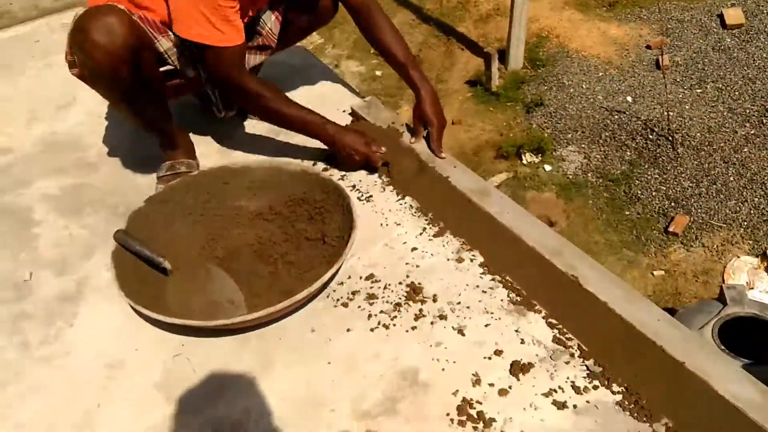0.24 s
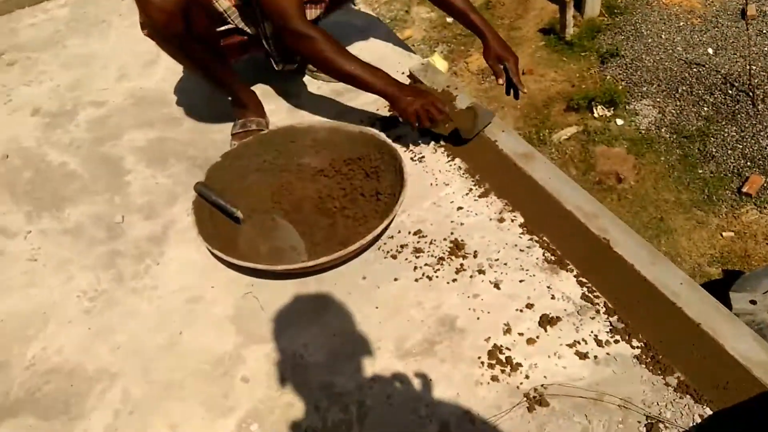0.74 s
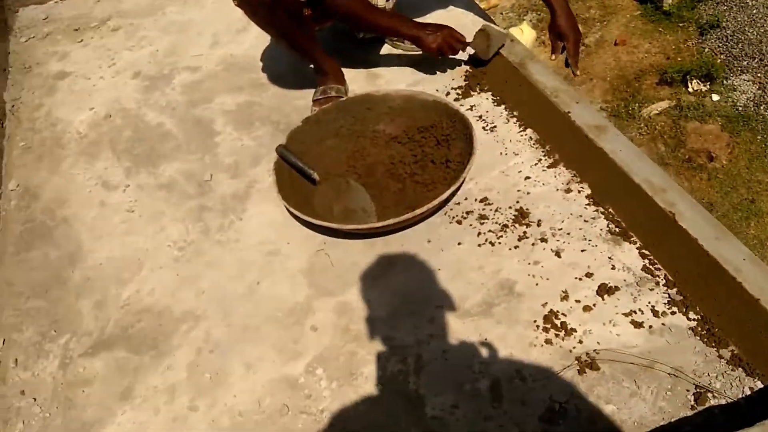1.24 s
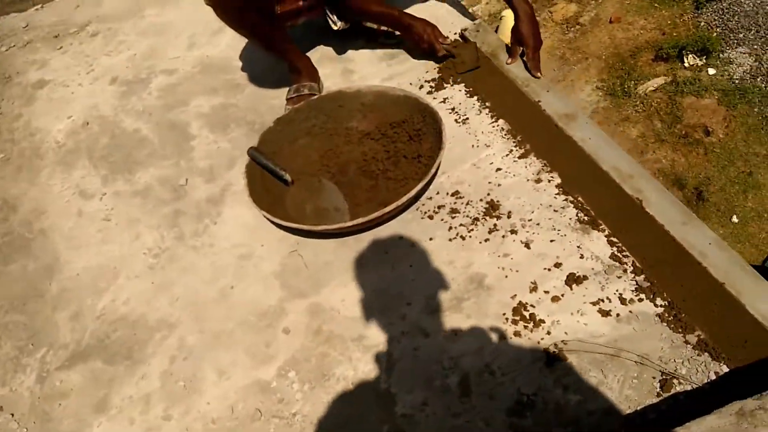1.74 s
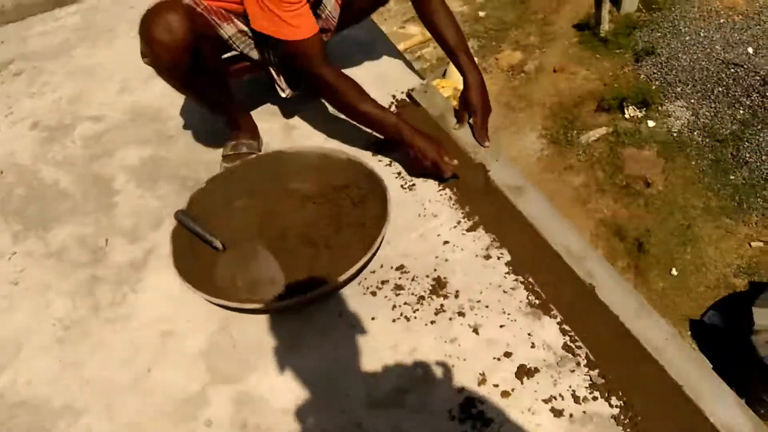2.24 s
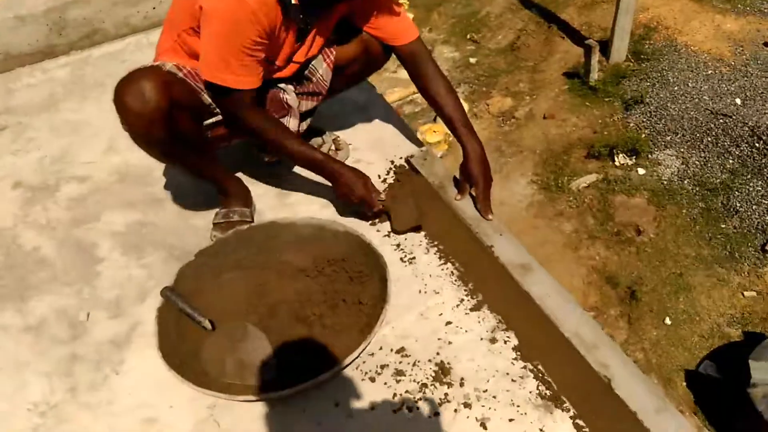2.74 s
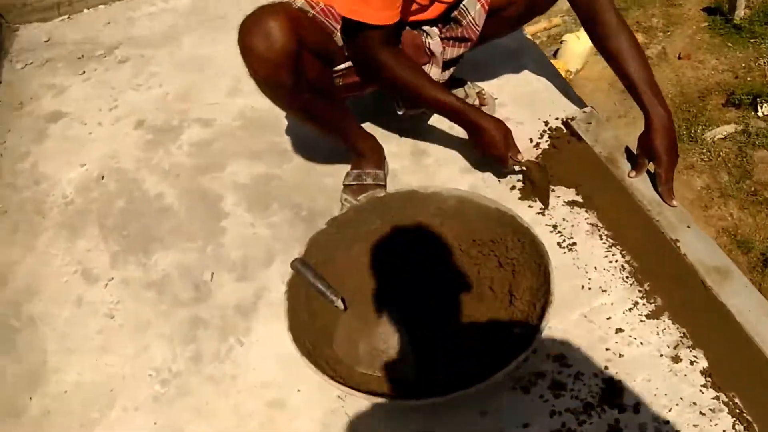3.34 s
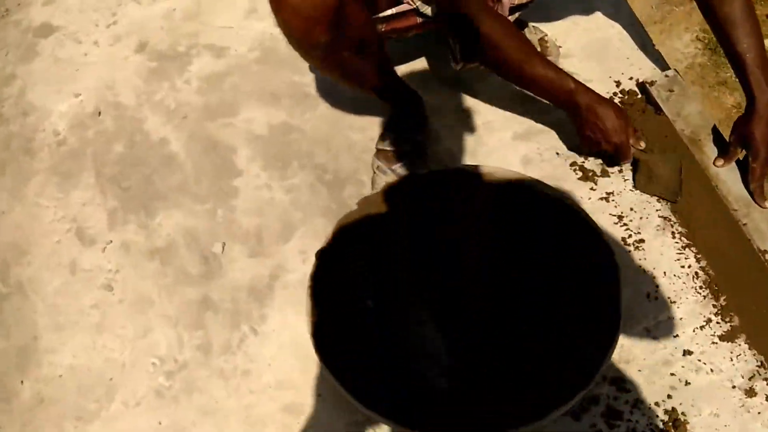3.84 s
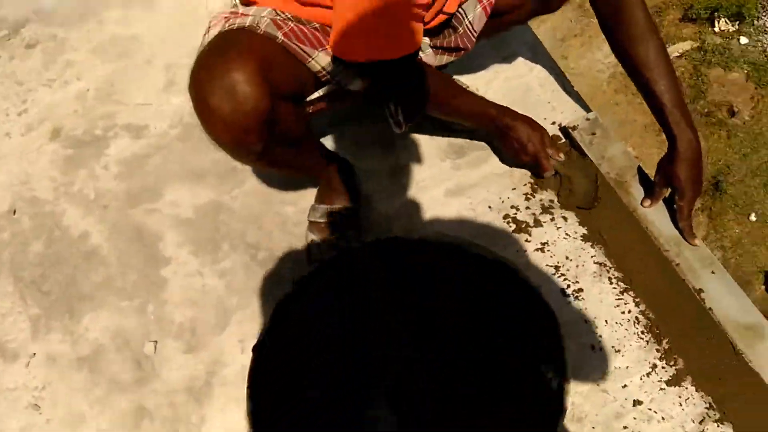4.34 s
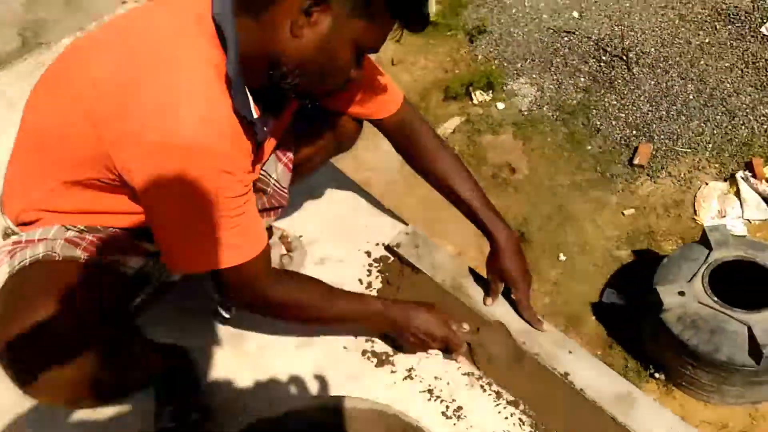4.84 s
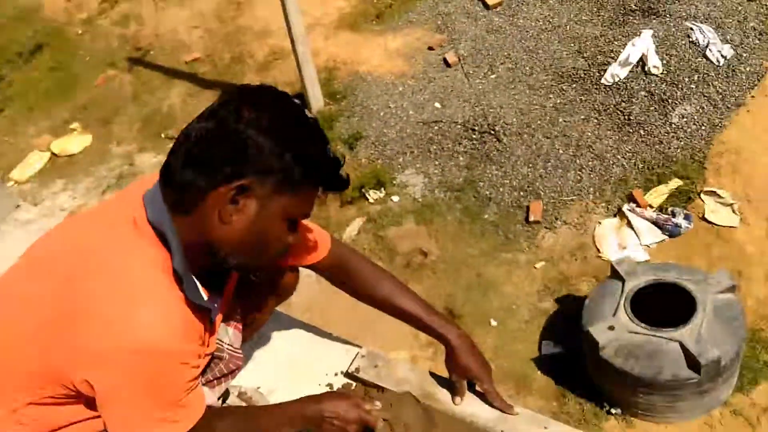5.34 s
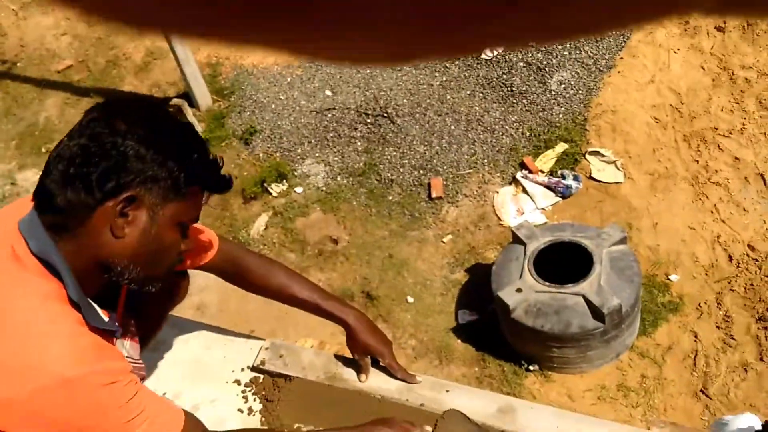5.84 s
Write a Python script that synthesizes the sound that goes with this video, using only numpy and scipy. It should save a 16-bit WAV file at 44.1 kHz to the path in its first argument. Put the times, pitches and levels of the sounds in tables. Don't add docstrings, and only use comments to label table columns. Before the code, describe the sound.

Wet mortar slaps with a short metallic ring, sandy trowel scrapes and crunching grit, under buffeting wind that overloads a close microphone.

```python
import sys
import numpy as np
from scipy import signal
from scipy.fft import rfft, irfft
from scipy.io import wavfile
from scipy.ndimage import uniform_filter1d

SR = 44100
rng = np.random.default_rng(int(sys.argv[2]) if len(sys.argv) > 2 else 0)


def rack_gain(trim_db):
    fader = np.asarray(trim_db, float)
    return 10 ** (fader / 20)


def waveform_to_disk(signal):
    frames = np.transpose(np.atleast_2d(signal))
    scaled = np.clip(frames, -1, 1) * 32767
    samples = np.round(scaled).astype(np.int16)
    wavfile.write(sys.argv[1], SR, samples)


N = 269010
CLOCK = np.arange(N) / SR
COARSE = np.arange(0, N / SR + .01, .002)


def evened(x):
    return x / np.sqrt(np.mean(x ** 2) + 1e-20)


def colour(x, spectrum, lo_hz=0, hi_hz=SR):
    size = x.shape[-1]
    hz = np.fft.rfftfreq(size, 1 / SR)
    f, db = np.transpose(spectrum)
    outside = (hz < f[0]) | (hz > f[-1])
    z = rfft(x) * rack_gain(np.interp(np.log(hz + 1), np.log(f + 1), db) - 80 * outside)
    band = irfft(z * ((hz >= lo_hz) & (hz <= hi_hz)), size)
    return irfft(z, size) / np.sqrt(np.mean(band ** 2))


def curves(rows):
    s, *columns = np.transpose(rows)
    return [np.interp(CLOCK, s, c) for c in columns]


def drift(top_hz, channels=1, size=N):
    return evened(signal.lfilter(*signal.butter(2, top_hz, fs=SR), rng.standard_normal((channels, size))))


def grains(per_s, spread_db, channels=1):
    size = rack_gain(spread_db * np.minimum(rng.exponential(1, (channels, N)), 5))
    return size * rng.standard_normal((channels, N)) * (rng.random((channels, N)) < per_s / SR)


def resonate(x, hz, width):
    r = np.exp(-np.pi * width / SR)
    if np.isscalar(hz):
        return 2 * signal.lfilter([1 - r], [1, -r * np.exp(2j * np.pi * hz / SR)], x).real
    turn = np.exp(2j * np.pi * np.cumsum(hz) / SR)
    return 2 * (turn * signal.lfilter([1 - r], [1, -r], x * turn.conj())).real


def add(mix, s, sound):
    part = mix[round(s * SR):][:len(sound)]
    part += sound[:len(part)]


def ports(level_db, pan_db):
    return 2 * rack_gain(level_db) / np.sqrt(1 + rack_gain(2 * np.array([-pan_db, pan_db])))


def swells(rows, ends_db, flat):
    middle, length, db = np.transpose(rows)[:3, :, None]
    from_middle = abs(2 * (COARSE - middle) / np.maximum(length, .02))
    return rack_gain(2 * (db + ends_db * from_middle ** flat)) + 1e-30


def fine(v):
    return np.interp(CLOCK, COARSE, v)


def buffets(rows, ends_db, flat, calm):
    share = ports(0, np.transpose(rows)[3]) ** 2
    return np.sqrt(calm ** 2 + [fine(p) for p in share @ swells(rows, ends_db, flat)])


def patchy(x, patch_db):
    z = signal.stft(x, nperseg=512, noverlap=384)[2]
    field = uniform_filter1d(rng.standard_normal(z.shape), size=12, axis=0)
    field = uniform_filter1d(field, size=22, axis=1)
    return evened(signal.istft(z * rack_gain(patch_db * evened(field)), nperseg=512, noverlap=384)[1][:N])


# pitch_hz, level_db (per Hz)
AIR_TONE = [(180, -41), (300, -1), (985, -18), (2130, -11.5), (4300, -18.5), (7000, -14), (10400, -14.5),
            (14800, -17), (15720, -4), (15950, -68)]
# pitch_hz, level_db
WHINES = [(11000, -82), (13000, -83), (14000, -82), (15000, -74)]


def air():
    hiss = rack_gain(-60) * colour(rng.standard_normal((2, N)), AIR_TONE, lo_hz=1000, hi_hz=16000)
    return hiss + sum(rack_gain(db) * np.sin(2 * np.pi * hz * CLOCK) for hz, db in WHINES)


# start_s, peak_db, left_minus_right_db
POPS = [(0.536, -5, 5), (0.566, 6, 30), (0.597, 0, -25), (0.649, 6.5, -24), (0.671, -6, 22),
        (0.693, 3.5, 32), (0.717, 4, 14), (0.736, 9, 35), (0.776, 3, 35), (0.827, -3.5, 30),
        (0.835, -2.5, 32), (1.457, -11, -13), (1.733, -10.5, -18), (3.014, -5, 48), (3.031, -7.5, 44),
        (3.044, -6.5, 39), (3.416, -12, 23), (3.497, -29, -26), (3.528, -10.5, -31), (3.598, -9.5, -31),
        (4.234, -12.5, -27.5), (4.599, -7, 26), (4.615, -11.5, 25), (4.638, -3.5, 30), (4.843, -4, 8),
        (2.824, -24, 24), (2.858, -17.5, 29), (2.919, -21, 26), (2.997, -17, 32), (3.672, -15, 20),
        (5.444, -4.5, 16), (5.552, -0.5, 33), (6.006, 5, 16), (6.031, -1, -35)]
# start_s, peak_db (played 9.5 dB higher), left_minus_right_db (played doubled)
CRACKLE = [(0.024, -13, 8), (0.049, -13, -22), (0.086, -15, 0), (0.129, -11, -12), (0.196, -1, -20),
           (0.279, -25, 13), (0.306, -12, -4), (0.344, -25, 20.0), (0.368, -14, 22.0), (0.462, -20, 8),
           (0.477, -8.5, -20), (0.507, -20, 11.0), (0.548, -9, 1), (0.574, -16, 4), (0.608, -6, 21),
           (0.618, -14.5, 3), (0.629, -9.5, -6), (0.749, -7, 5), (0.767, -10, 16), (0.805, -36, 12.5),
           (1.638, -23.5, 0.0), (1.812, -34.5, -8), (4.587, -17.5, 14), (4.656, -16, 15),
           (5.289, -27.5, 14), (5.316, -29, 10), (5.368, -15, 15.5), (5.384, -14, 16), (5.406, -21, -9),
           (5.421, -14, 5), (5.455, -17.5, -3), (5.463, -11.5, -4), (5.491, -34, -1.5), (5.525, -21, 18.5),
           (5.576, -15, 17.0), (5.614, -12.5, 16), (5.717, -26, -2.5), (5.73, -22, 9), (5.939, -0.5, -25),
           (5.971, -21, -9), (6.054, -7, 5), (5.753, -17, 8), (6.066, -13, 5), (5.916, -14, 14),
           (1.729, -19.5, -5)]


def port_pops():
    out, t = np.zeros((2, N)), np.arange(1500) / SR
    more_pops = [(s, db + 9.5, 2 * pan) for s, db, pan in CRACKLE]
    for s, peak_db, pan_db in POPS + more_pops:
        pop_ms = 0.605 * rack_gain(-.5 * np.minimum(peak_db, 0))
        u = t * 1000 / pop_ms
        jump = 9 * u ** 3.63 * (1 - u / 8.2) * np.exp(-2.4 * u)
        flutter = 0.14 * np.sin(3.57 * u) * u * np.exp(-.55 * u)
        sign = rng.choice([-1., 1.])
        for port, gain in zip(out, ports(peak_db, pan_db)):
            add(port, s, sign * gain * (jump + flutter))
    return out


# time_s, rumble_db, left_minus_right_db
BREEZE = [(0, -10, 14), (.25, -12, 7), (1.17, -15.5, -2), (1.28, -33, -8.5), (1.54, -27, 10),
          (1.92, -37.5, -4), (2.24, -38, -5), (2.7, -39.5, 1.5), (2.97, -47, 5), (3.25, -28.5, -2),
          (3.84, -32, 8), (4.08, -47.5, 3), (4.46, -52, 10), (4.51, -27, 21), (4.54, -17.5, 24),
          (4.98, -32.5, -20), (5.66, -28.5, 5), (6.1, -5.5, 7)]
# middle_s, length_s, rumble_db, left_minus_right_db
GUSTS = [(.1, 0.34, -11, -15), (.78, 0.17, -9.5, 15), (.86, 0.09, -42, -22), (1.19, 0.44, -16.5, 0),
         (1.79, 0.28, -20.5, -23.5), (2.0, 0.07, -20.5, -31), (2.46, 0.25, -23, -34),
         (2.58, 0.094, -23, -24), (2.88, 0.21, -17.5, 27.5), (3.04, 0.11, -7.5, 57), (3.15, 0.14, -11, 12),
         (3.31, 0.13, -27, 20), (3.45, 0.12, -20.5, 27), (3.52, 0.095, -16, -25), (3.61, 0.25, -23.5, -1),
         (3.68, 0.058, -17.5, 24), (3.74, 0.099, -19.5, -19), (3.79, 0.03, -12, 14),
         (3.94, 0.24, -23.5, 10), (4.15, 0.078, -22.5, -41), (4.28, 0.14, -18.5, -10),
         (4.575, 0.18, -15.5, 32), (4.7, 0.18, -24, 3), (4.89, 0.14, -14, -14), (5.05, 0.23, -17, -24),
         (5.13, 0.16, -17.5, 4.5), (5.35, 0.92, -19.5, 0), (5.45, 0.29, -9, 16), (5.59, 0.094, -4.5, 34),
         (5.74, 0.2, -10.5, 26), (5.98, 0.14, -4, -4)]
# middle_s, length_s, level_db, left_minus_right_db
EDDIES = [(0, 0.12, -20.5, -0.5), (.13, 0.39, -22, 3), (.35, 0.29, -21, 20), (.6, 0.45, -19.5, 5.5),
          (1.0, 0.37, -26.5, -3), (1.2, 0.11, -32.5, 24), (1.48, 0.099, -54, -8), (1.7, 0.42, -41.5, -7.5),
          (2.28, 0.61, -51.5, -1.5), (2.49, 0.098, -42, -2.5), (3.035, 0.081, -34.5, 39.5),
          (3.2, 0.25, -37.5, -1), (3.51, 0.039, -31, -8.5), (3.7, 0.09, -62, 18), (3.88, 0.36, -48.5, -5),
          (4.28, 0.083, -57, -25.5), (4.635, 0.19, -31, 34), (4.74, 0.18, -49.5, -7), (4.86, 0.2, -41, -11),
          (5.0, 0.53, -42, -3), (5.38, 0.22, -27, 7), (5.46, 0.087, -20, 10), (5.59, 0.088, -21, 27),
          (5.742, 0.098, -25, 22), (5.98, 0.2, -16.5, -5), (6.1, 0.49, -23.5, 3)]
# pitch_hz, level_db (per Hz)
RUMBLE_TONE = [(12, -53), (20, -23.5), (48, 3.5), (81, 0), (147, -9), (215, -19.5), (259, -23),
               (409, -42.5), (600, -65.5), (780, -99.5)]
# pitch_hz, level_db (per Hz)
EDDY_TONE = [(88, -70.5), (150, 5.5), (470, -5), (516, -14.5), (548, -8), (1340, -27), (3780, -52),
             (6000, -67.5), (7800, -91.5)]


def wind():
    lumps = rack_gain(1.0 * drift(34, channels=2))
    rumble = colour(rng.standard_normal((2, N)) * lumps, RUMBLE_TONE, lo_hz=30, hi_hz=163.0)
    clusters = rack_gain(2.2 * np.clip(drift(30, channels=2), -4, 1.3))
    churn = colour(grains(1300, 3.04, channels=2) * clusters, EDDY_TONE, lo_hz=307, hi_hz=530)
    breeze_db, breeze_pan_db = curves(BREEZE)
    gust_gains = buffets(GUSTS, -26, 2.05, ports(breeze_db, breeze_pan_db))
    calm_eddies = ports(-35 + 0.75 * breeze_db, breeze_pan_db)
    eddy_gains = buffets(EDDIES, -20, 2.56, calm_eddies)
    return gust_gains * rumble + eddy_gains * churn + port_pops()


# start_s, peak_db
TICKS = [(1.8372, -27), (1.92, -34), (1.979, -27), (3.1617, -12), (3.2011, -9), (3.213, -13), (3.2264, -34),
         (3.459, -32), (3.5732, -11), (3.91, -17), (3.9554, -31), (3.9749, -9), (4.0094, -14),
         (4.4822, -30), (4.5156, -33), (4.543, -11), (4.5635, -36), (4.595, -11), (4.624, -13),
         (4.6474, -17), (4.6548, -8), (4.6794, -20), (4.7212, -22), (4.7351, -9), (4.7551, -2.5),
         (4.7944, -11), (5.8105, -6), (5.8511, -2), (2.185, -24), (2.333, -10), (2.379, -11),
         (2.359, -13.5), (4.536, -23)]
# pitch_hz, level_db (per Hz)
TICK_TONE = [(1500, -33), (3000, 1), (8000, 0.5), (15000, -20.5), (16300, -17.5)]


def ticks():
    out, t = np.zeros((2, N)), np.arange(1000) / SR
    decay_s = 0.0017
    for s, peak_db in TICKS:
        a, b = rng.standard_normal((2, len(t)))
        cracks = colour(np.array([a, 0.27 * a + 0.7 * b]), TICK_TONE, lo_hz=5000, hi_hz=15000)
        for port, crack in zip(out, cracks):
            add(port, s, rack_gain(peak_db - 11) * crack * np.exp(-t / decay_s))
    return out


# start_s, end_s, first_pitch_hz, last_pitch_hz, level_db
SQUEALS = [(1.0, 1.105, 1430, 1550, -26), (1.08, 1.177, 1393, 1560, -22.5), (1.147, 1.214, 1470, 1710, -33),
           (1.211, 1.3, 1970, 2280, -39), (2.171, 2.263, 1160, 1300, -20.5),
           (2.194, 2.277, 1900, 2150, -28.5), (2.271, 2.372, 1540, 2060, -28.5),
           (2.26, 2.32, 3300, 3580, -33), (2.378, 2.443, 1800, 1780, -32), (2.42, 2.468, 1155, 1200, -33),
           (2.489, 2.54, 2240, 2420, -34), (3.147, 3.25, 1900, 1900, -26.5),
           (3.216, 3.289, 1500, 1550, -22), (3.226, 3.294, 2380, 2570, -23),
           (3.908, 3.974, 1620, 1740, -28), (3.974, 4.025, 2700, 2820, -25), (4.459, 4.54, 3500, 3800, -36),
           (4.575, 4.67, 2770, 2700, -29), (4.593, 4.7, 2250, 2100, -35), (4.628, 4.734, 3840, 4170, -27),
           (4.746, 4.79, 2440, 1970, -22), (4.746, 4.795, 1090, 1000, -24), (4.763, 4.833, 1610, 1740, -28),
           (4.75, 4.803, 4240, 4000, -29), (4.789, 4.866, 3220, 3100, -27), (5.268, 5.325, 1230, 1330, -50),
           (5.626, 5.66, 1370, 1410, -47), (5.713, 5.733, 2240, 2110, -28), (5.74, 5.749, 1000, 960, -16),
           (5.788, 5.803, 2180, 2100, -26), (2.828, 2.847, 1800, 1750, -53.5),
           (1.833, 1.908, 4250, 4340, -40.5), (1.838, 1.887, 2260, 2570, -29.5),
           (1.865, 1.885, 1700, 1620, -24), (1.888, 1.938, 1650, 1620, -45), (2.277, 2.322, 980, 1060, -29),
           (1.279, 1.288, 1450, 1450, -37)]


def squeals():
    out, width_hz, lag_samples = np.zeros(N), 140, 1
    for start, end, first_hz, last_hz, db in SQUEALS:
        u = np.linspace(0, 1, round((end - start) * SR))
        a, b, c = rng.standard_normal((3, 6000))[:, :len(u)]
        slips = a * rack_gain(4.6 * evened(uniform_filter1d(b, size=300))) * (c > .5)
        hz = first_hz + (last_hz - first_hz) * u
        song = resonate(resonate(slips, hz, width_hz * 1.54), hz, width_hz * 2.5)
        add(out, start, rack_gain(db) * evened(song) * np.sin(np.pi * u ** 0.85))
    return np.array([np.roll(out, lag_samples) * rack_gain(-1.5), out * rack_gain(-5.5)])


# start_s, peak_db, pitch_hz, length_s
CATCHES = [(0.009, 2.5, 2530, 0.003), (0.078, -6, 6900, 0.02), (0.099, 14.5, 7540, 0.0016),
           (1.047, 2, 1670, 0.014), (1.105, 10.5, 1750, 0.0056), (1.144, 2, 1500, 0.0074),
           (1.846, -1.5, 1720, 0.031), (1.8657, 10, 2360, 0.0032), (2.226, 7, 1320, 0.0061),
           (2.278, 7, 7000, 0.0052), (2.293, 13, 1610, 0.0034), (2.436, -8, 7300, 0.011),
           (2.54, 12.5, 7740, 0.0016), (3.158, -4, 1960, 0.0092), (3.251, 0, 2400, 0.0063),
           (3.569, 9, 1740, 0.0028), (3.911, -5.5, 1660, 0.011), (4, 6.5, 2780, 0.0029),
           (4.511, 0.5, 2890, 0.021), (4.547, 0, 2850, 0.0035), (4.562, 6, 2990, 0.0044),
           (4.766, 8.5, 1900, 0.0074), (5.604, -5, 5860, 0.019), (5.711, -3.5, 6000, 0.021),
           (5.742, 3, 2120, 0.0026), (5.797, -21, 2130, 0.0048),
           (1.847, -36, 4370, 0.014),
    (2.831, -24, 4460, 0.0085),
    (2.977, -27, 1600, 0.006),
    (3.903, -11, 4030, 0.015),
]


def catches():
    out, t = np.zeros(N), np.arange(3000) / SR
    for s, peak_db, hz, length in CATCHES:
        noise = rng.standard_normal(len(t))
        main = evened(resonate(noise, hz, 0.16 * hz))
        low = evened(resonate(noise, 0.18 * hz, 0.13 * hz))
        bright = evened(np.diff(noise, prepend=0))
        crunch = main + 0.047 * low + 0.039 * bright
        fade = np.exp(-t / np.maximum(length, .001)) * np.minimum(t / 0.00022, 1)
        add(out, s, rack_gain(peak_db - 24.5) * crunch * fade)
    return out


# middle_s, length_s, fine_sand_db, coarse_grit_over_sand_db, loudest_blade_pitch_hz
STROKES = [(0, 0.059, -34.5, -13, 2270), (0.132, 0.13, -30, 1.5, 1540), (0.294, 0.43, -29.5, -11, 1290),
           (0.473, 0.16, -38.5, 4.5, 1365), (0.992, 0.68, -38.5, 7.5, 1480),
           (1.118, 0.25, -32.5, 0.5, 1634), (1.654, 0.27, -56, 7.5, 1640), (1.854, 0.1, -38, -1, 2114),
           (2.077, 0.34, -35, -6.5, 1950), (2.261, 0.26, -29, -2.5, 1400), (2.431, 0.13, -30, -2, 1740),
           (2.548, 0.28, -31, -9.5, 2206), (3.243, 0.19, -33.5, 7, 1770), (3.39, 0.47, -59, 10, 2200),
           (3.572, 0.15, -46.5, 7, 1880), (3.977, 0.11, -34.5, 6, 2350), (4.043, 0.11, -42, -2.5, 2860),
           (4.492, 0.17, -41, 3, 2940), (4.661, 0.22, -34.5, 5, 2900), (4.771, 0.13, -30.5, 8.5, 2290),
           (4.98, 0.33, -28.5, -6.5, 2740), (5.638, 0.66, -36.5, -2, 1610), (5.851, 0.26, -29, 3.5, 1790),
           (6.061, 0.14, -30, -3, 1500)]
# start_s, length_s, depth_db
LIFTS = [
    (0.588, 0.39, -23.5),
    (1.295, 0.26, -10.5),
    (2.338, 0.034, -10),
    (2.694, 0.28, -10),
    (3.281, 0.064, -13),
    (3.79, 0.13, -29),
    (5.145, 0.13, -8),
    (4.084, 0.2, -2.5),
]
# pitch_hz, level_db (per Hz)
SAND_TONE = [(2060, -10), (3500, -11), (4670, -7.5), (5930, 3.5), (8500, -1), (11500, -19.5), (15500, -49)]
# pitch_hz, level_db (per Hz)
DUST_TONE = [(5880, -8), (10000, -5), (13000, -7), (15100, -11), (16300, -19)]
# pitch_hz, level_db (per Hz)
GRIT_TONE = [(410, -40), (700, 1.5), (1270, 4), (1450, -1), (1890, -5), (2370, -8.5), (3120, 0), (5000, -8),
             (9000, -26.5), (12500, -51.5)]
# pitch_hz, width_hz, level_db
PRESSED_BLADE = [(1080, 54, -6.5), (1480, 38, -25), (1968, 34, 20.5), (2450, 61, 11), (2378, 80, 23.5),
                 (3800, 100, -10.5), (3970, 1500, 12)]


def strokes():
    power = swells(STROKES, -15, 2.47)
    total = power.sum(axis=0)
    lifted_db = sum(db * ((COARSE > s) & (COARSE < s + length)) for s, length, db in LIFTS)
    touch = fine(np.sqrt(total) * rack_gain(uniform_filter1d(lifted_db, size=3)))
    grit_db, peak_hz = [fine(c @ power / total) for c in np.transpose(STROKES)[3:]]
    judder_db = drift(130)[0]
    sand = colour(grains(9000, 0.46)[0] * rack_gain(2.0 * judder_db), SAND_TONE, lo_hz=4630, hi_hz=10200)
    dust = colour(grains(9000, 0.84)[0] * rack_gain(2.0 * judder_db), DUST_TONE, lo_hz=10870, hi_hz=14640)
    clicks = grains(5000, 2.2)[0] * rack_gain(2.2 * np.minimum(judder_db, 1.8))
    blade = 0.045 * clicks + rack_gain(17) * resonate(clicks, peak_hz, 140)
    for hz, width, db in PRESSED_BLADE:
        bend = 1 + .05 * drift(4)[0]
        blade = blade + rack_gain(db + 0.5 * drift(0.51)[0]) * resonate(clicks, hz * bend, width)
    grit = colour(blade, GRIT_TONE, lo_hz=1190, hi_hz=3970)
    rubbing = patchy(sand, 2.9) + rack_gain(grit_db) * patchy(grit, 2.0) + rack_gain(-13.5 + 0.23 * grit_db) * dust
    return rack_gain(-1.0) * touch * rubbing


# start_s, peak_db, ring_db, splash_length_s, grip_damping (a factor)
SLAPS = [
    (0.1268, -11, -17, 0.0041, 0.53),
    (0.8731, -8.5, -4, 0.031, 1.17),
    (1.4951, -7, -8, 0.023, 0.92),
    (2.0771, -10, -6, 0.026, 0.93),
    (3.084, -5.5, -11.5, 0.016, 1.7),
    (3.7082, -11, -12.5, 0.022, 0.97),
    (4.2973, -11, -4.5, 0.02, 1.36),
    (4.84, -14.5, -7, 0.032, 1.4),
    (5.8317, -8.5, -21, 0.019, 1.6),
]
BEND_DB = [7, -6, -1, 1, 0.5, 0, -2, -1, -2.5]
PLOP_DB = [6, -3, -6.5, 2.5, -14, 3, -4, 0, 10.5]
# pitch_hz, level_db (per Hz)
SPLASH_TONE = [(88, -49), (150, -7.5), (316, -2), (409, -5.5), (570, -1.5), (951, -4.5), (1200, -7),
               (2350, -13.5), (3090, -19.5), (7780, -29.5), (15200, -52), (16400, -57.5)]
# pitch_hz, width_hz, level_db
WET_BLADE = [(2230, 160, 0.5), (4350, 1000, -1.5)]
# pitch_hz, level_db, time_to_fall_60_db_s
FREE_BLADE = [(298.7, 5.5, 0.2), (572.4, 0.0, 0.45), (622, -5.5, 0.56), (937, -10, 0.5),
              (1233, -24.5, 0.95), (1540, 2.5, 0.26), (1900, -1.5, 0.14), (2150, -8.5, 0.068),
              (237.0, -13.5, 0.34), (338.4, -5, 0.46), (2400, -10.5, 0.21)]


def splashes():
    out, t = np.zeros(N), np.arange(24000) / SR
    for (s, peak_db, _, hold, _), bend_db, plop_db in zip(SLAPS, BEND_DB, PLOP_DB):
        spray_db = 2 - 0.24 * peak_db
        thump_db = 5.5 + bend_db
        tilted = [(hz, db + spray_db * np.clip(np.log2(hz / 2500), 0, 1) + thump_db * (hz < 500))
                  for hz, db in SPLASH_TONE]
        wet = colour(rng.standard_normal(len(t)), tilted, lo_hz=715, hi_hz=2890)
        squirt = 1.05 * wet + rack_gain(plop_db) * resonate(wet, 806, 220)
        squirt = squirt + sum(rack_gain(db) * resonate(wet, hz, width) for hz, width, db in WET_BLADE)
        squirt = squirt + 1.41 * sum(resonate(wet, hz, 59) for hz, _, _ in FREE_BLADE)
        fall_60_db_s = 0.21
        squirt = squirt * rack_gain(-60 * np.maximum(t - hold, 0) / fall_60_db_s) * np.minimum(t / 0.0004, 1)
        contact = 4.0 * np.sin(2 * np.pi * 900 * t) * np.exp(-t / 0.0041)
        add(out, s, rack_gain(peak_db - 6.5) * (squirt - contact))
    return out


TWIST_DB = [-9, 4, 0.5, -3, -18, -3, -4.5, 1, 2]


def blade_rings():
    out, t = np.zeros(N), np.arange(24000) / SR
    peel_hz, peel_s, twist_hz = 103, 0.08, 617
    peel_turns = peel_hz * (t - peel_s * (1 - np.exp(-t / peel_s)))
    for (s, peak_db, ring_db, _, grip), twist_db, bend_db in zip(SLAPS, TWIST_DB, BEND_DB):
        ring = np.zeros(len(t))
        for hz, db, t60 in FREE_BLADE:
            share_db = 1.5 * rng.standard_normal()
            share_db += twist_db * (abs(hz - twist_hz) < 25) + bend_db * (hz < 400)
            turns = hz * t + rng.random() + peel_turns * (hz < 260)
            ring += rack_gain(db + share_db - 60 * t * grip / t60) * np.sin(2 * np.pi * turns)
        wobble = 1 + 0.1 * drift(25, size=len(t))[0]
        add(out, s, rack_gain(peak_db + ring_db + 8.5) * wobble * ring * np.minimum(t / 0.0009, 1))
    return out


def slab(edge, face, rings):
    left_lag, edge_lag = 15, 6
    low = signal.filtfilt(*signal.butter(2, 3000, fs=SR), edge)
    right = edge + face + rings
    left = np.roll(face + rings, left_lag) + low + np.roll(edge - low, edge_lag)
    scattered = signal.lfilter(*signal.butter(2, 1000, "high", fs=SR), edge + 0.73 * face)
    t, wet = np.arange(4000) / SR, 0
    for k in range(4):
        echoes = rng.standard_normal((2, len(t))) * rack_gain(-60 * t / .05) * (t > .0005)
        echoes = echoes / np.linalg.norm(echoes[0])
        sway = np.cos(2 * np.pi * (45 + 37 * k) * CLOCK + k) / np.sqrt(2)
        wet = wet + signal.oaconvolve(sway * scattered[None], echoes, axes=1)[:, :N]
    return np.array([left * rack_gain(-3.0), right * rack_gain(-4.5)]) + rack_gain(3.0) * wet


def scene():
    edge = strokes() + rack_gain(-1.5) * catches()
    trowel = slab(edge, splashes(), blade_rings())
    return air() + wind() + ticks() + squeals() + trowel


def low_pass(x):
    return signal.sosfilt(signal.butter(12, 16560, fs=SR, output="sos"), x)


def record(dry):
    cut = signal.sosfilt(signal.butter(3, 52, "high", fs=SR, output="sos"), dry)
    clipped = cut / (1 + abs(cut) ** 14) ** (1 / 14)
    treble_limit = signal.firwin(127, 15900, window=("kaiser", 5), fs=SR)
    band = signal.oaconvolve(clipped, treble_limit[None], "same")
    return low_pass(band)


dry = scene()
out = record(dry)
waveform_to_disk(out)
```